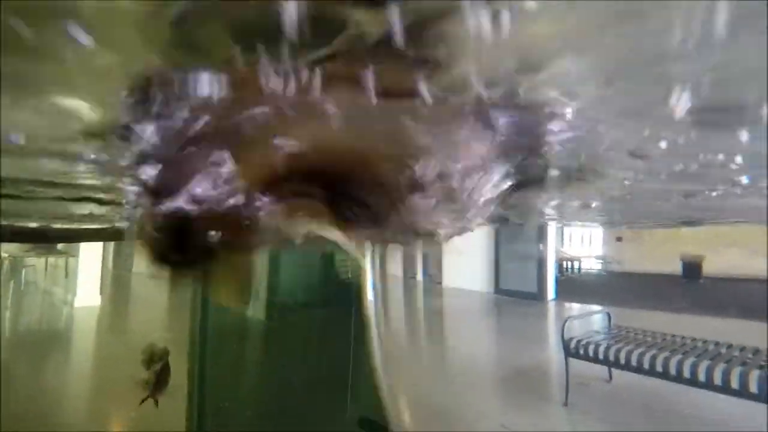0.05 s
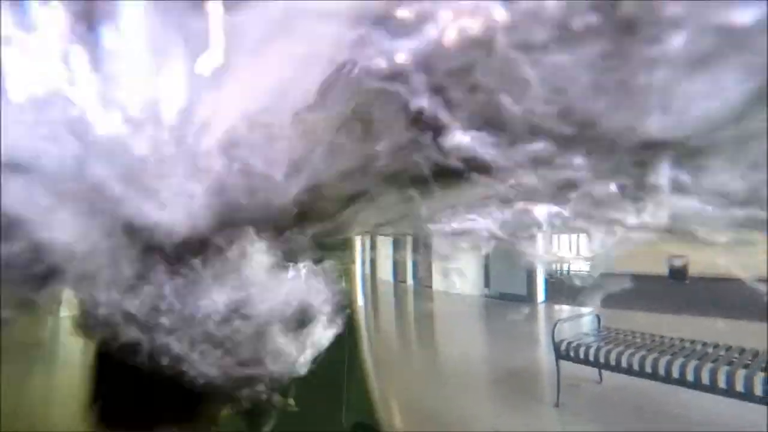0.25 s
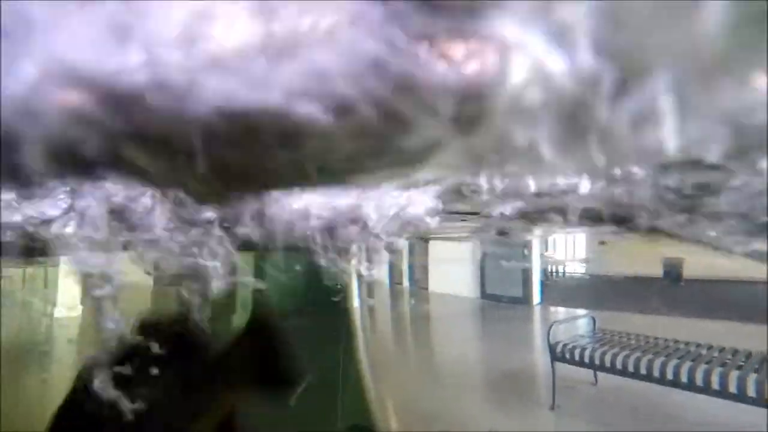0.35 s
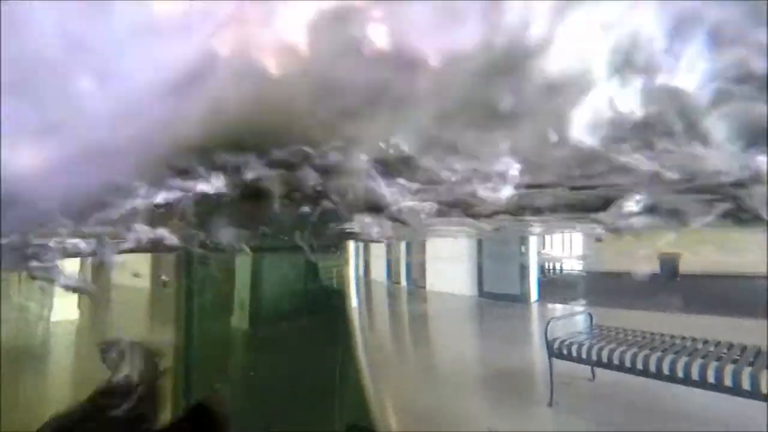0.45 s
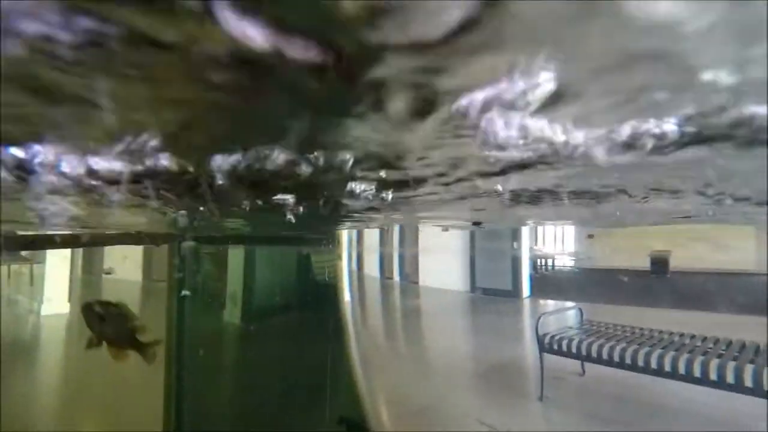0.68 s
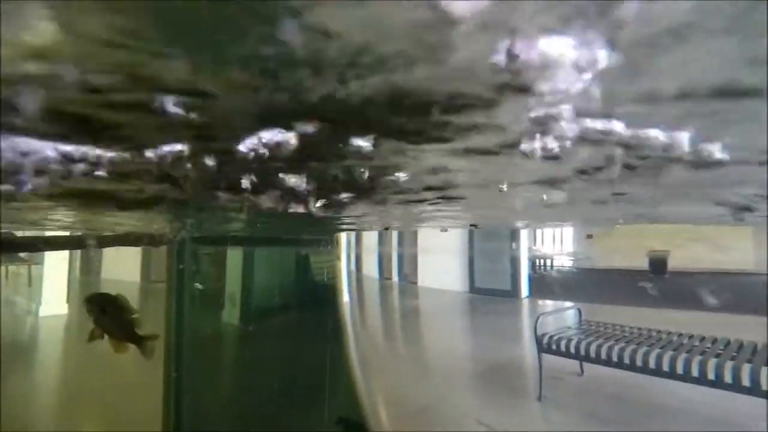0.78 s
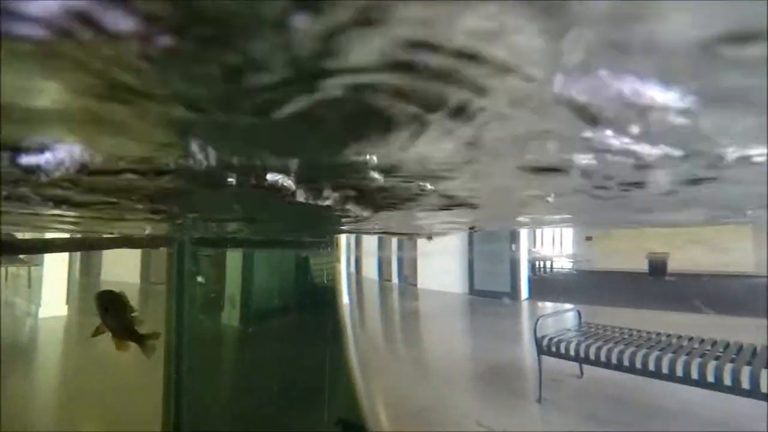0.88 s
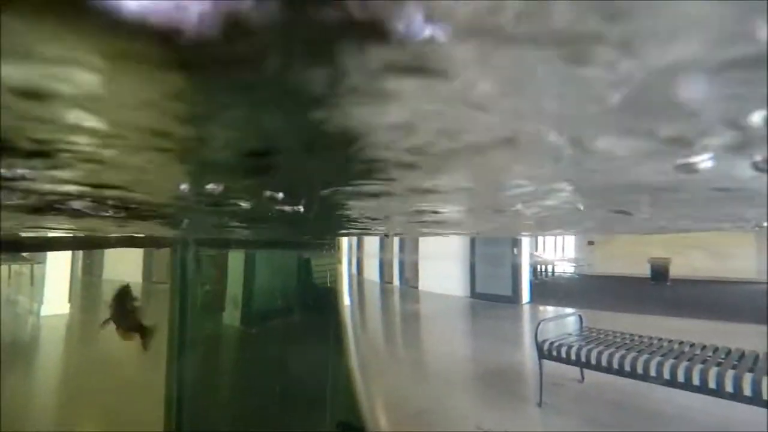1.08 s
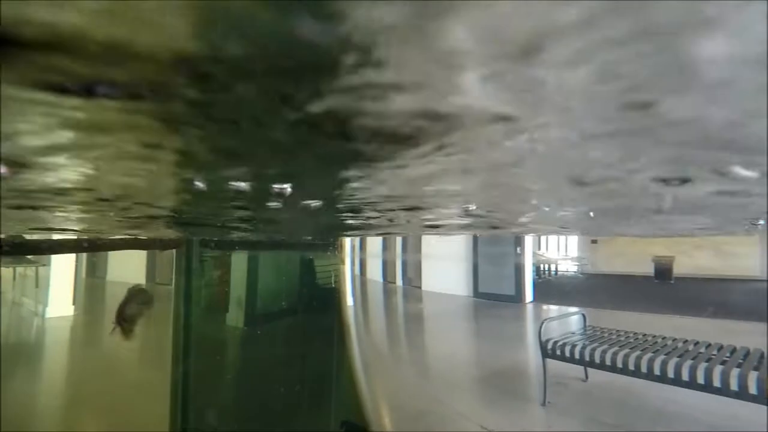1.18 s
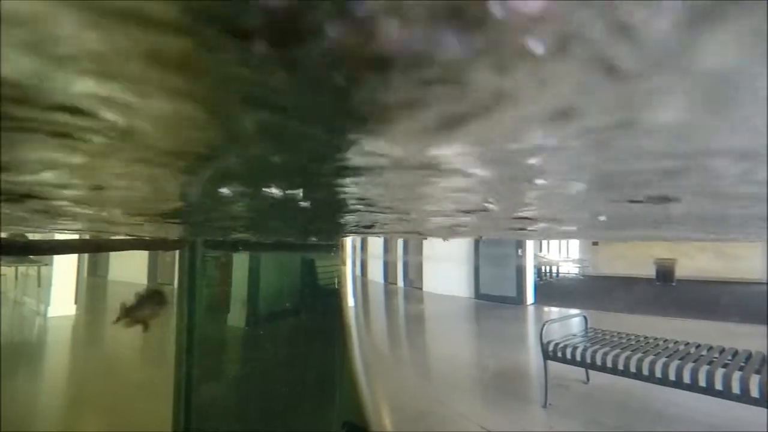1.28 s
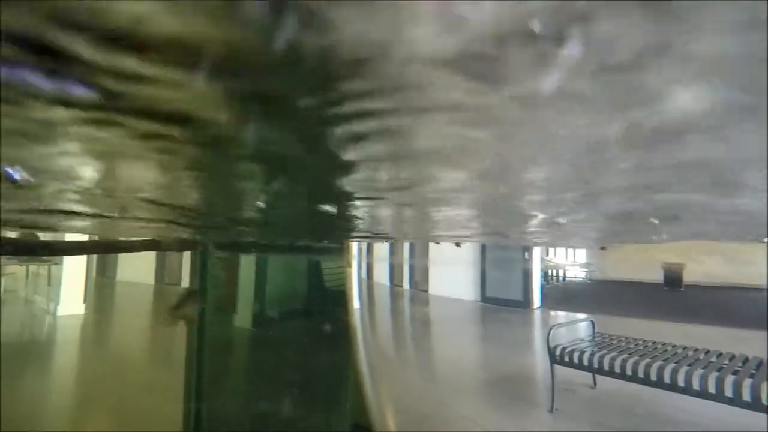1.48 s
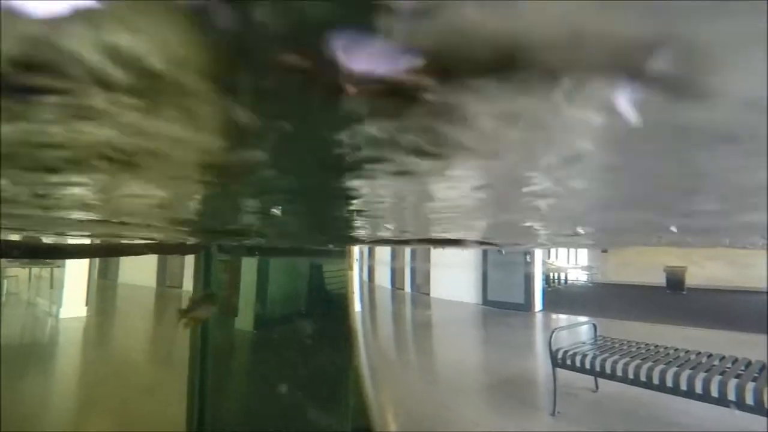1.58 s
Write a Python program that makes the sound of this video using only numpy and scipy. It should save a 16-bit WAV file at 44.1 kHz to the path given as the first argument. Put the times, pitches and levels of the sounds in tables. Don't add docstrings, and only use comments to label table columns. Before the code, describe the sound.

A fish splash in a tank, heard very close inside a housing just under water. Soft hollow gulps until 0.2 s, then a bright clatter of bubbles around 0.23-0.29 s and a sharper, snapping burst near 0.36 s, with dull thumps and hissing fizz. Gulps at 0.46 s, light ticks around 0.7 s, then sparse faint drips, one clearer near 1.28 s, over a low calm murmur until about 1.6 s.

```python
import sys
import numpy as np
from scipy import signal
from scipy.fft import rfft, irfft
from scipy.io import wavfile
from scipy.ndimage import uniform_filter1d

SR = 44100
rng = np.random.default_rng(int(sys.argv[2]) if len(sys.argv) > 2 else 0)


def natural_amplitude(level_db):
    exponent = np.asarray(level_db, float) / 20
    return 10 ** exponent


def transcribe(signal):
    frames = np.atleast_2d(signal).T
    limited = np.clip(frames, -1, 1)
    pcm = np.round(limited * 32767).astype(np.int16)
    wavfile.write(sys.argv[1], SR, pcm)


N = 72765

# t/s, level/dB (peak), f/Hz, t60/s
LARGE_BUBBLES = [(0.009, -39.5, 1630, 0.027), (0.042, -33.5, 558, 0.031), (0.049, -28.5, 670, 0.022),
                 (0.064, -38, 1070, 0.024), (0.089, -32, 1044, 0.031), (0.105, -36, 572, 0.046),
                 (0.128, -36, 690, 0.025), (0.143, -39, 737, 0.092), (0.158, -27, 672, 0.059),
                 (0.205, -20, 730, 0.014), (0.302, -18, 690, 0.056), (0.424, -31.5, 617, 0.023),
                 (0.455, -17, 602, 0.044), (0.464, -17.5, 676, 0.048), (0.143, -35, 1007, 0.034),
                 (0.066, -36.5, 388, 0.034), (0.5, -39.5, 1075, 0.04)]
# t/s, level/dB (peak), f/Hz, t60/s
SMALL_BUBBLES = [(0.062, -46, 2140, 0.045), (0.127, -49, 2270, 0.01), (0.1665, -29.5, 2150, 0.017),
                 (0.204, -32.5, 2230, .012), (0.2225, -26, 2290, 0.0037), (0.2318, -17, 1980, 0.014),
                 (0.2355, -13, 2430, 0.0051), (0.2385, -14.5, 2070, 0.0055), (0.2408, -14, 3925, 0.01),
                 (0.241, -20.5, 1540, 0.013), (0.2445, -8, 2300, 0.0068), (0.2475, -20, 2210, 0.01),
                 (0.2513, -8, 2630, 0.0081), (0.2568, -4, 2080, 0.0051), (0.2595, -14.5, 4990, 0.0085),
                 (0.2605, -15, 2590, 0.014), (0.2635, -12, 1845, 0.011), (0.264, -15.5, 1260, 0.011),
                 (0.2655, -11.5, 2960, 0.0095), (0.2745, -13, 2350, 0.0088), (0.280, -21, 2750, 0.0077),
                 (0.2825, -9.5, 2230, 0.0088), (0.2845, -14, 2855, 0.0091), (0.2872, -7.5, 2780, 0.007),
                 (0.3037, -19, 3920, 0.0091), (0.309, -49, 6120, 0.0068), (0.343, -20.5, 1470, 0.024),
                 (0.351, -17.5, 2360, .01), (0.3553, -4, 1780, 0.0075), (0.3593, -10, 2694, 0.013),
                 (0.361, -5.5, 1905, 0.014), (0.3665, -15.5, 5910, 0.0081), (0.369, -25, 5000, .007),
                 (0.3745, -25.5, 6170, 0.0061), (0.383, -24, 4650, 0.0092), (0.384, -25.5, 3060, 0.0096),
                 (0.3844, -24, 1890, 0.026), (0.392, -33, 2650, 0.013), (0.4015, -29, 2860, 0.017),
                 (0.4242, -33, 3480, 0.019), (0.427, -35, 2070, 0.016), (0.448, -32, 1733, 0.025),
                 (0.457, -25, 1050, .022), (0.4793, -29.5, 1883, 0.025), (0.5385, -36, 2030, 0.032),
                 (0.5766, -31.5, 1820, 0.019), (0.5684, -38.5, 4560, .01), (0.5833, -23, 3140, 0.0078),
                 (0.5884, -29.5, 2460, 0.019)]
# t/s, level/dB (peak), f/Hz, t60/s
LAST_DRIPS = [(0.6813, -31.5, 1890, 0.032), (0.7013, -24.5, 2366, 0.015), (0.7191, -31, 1920, 0.014),
              (0.7718, -36.5, 2500, 0.0066), (0.7865, -40.5, 2235, 0.0047), (0.7985, -37.5, 3840, 0.0035),
              (0.8231, -47, 3120, .007), (0.8436, -44.5, 2140, 0.012), (0.844, -47.5, 1040, 0.015),
              (0.8945, -46.5, 2160, .008), (0.9982, -34.5, 2170, 0.0096), (1.0317, -46, 1363, 0.0073),
              (1.0475, -46, 2275, 0.018), (1.048, -41.5, 3320, .007), (1.0895, -41, 2350, 0.0066),
              (1.2232, -44, 2230, 0.012), (1.233, -51.5, 1500, 0.016), (1.279, -34.5, 1100, 0.0077),
              (1.2798, -26.5, 1575, 0.022), (1.3375, -46.5, 1880, .008), (1.36, -50, 3865, 0.023),
              (1.5041, -56, 2630, 0.0098), (1.6114, -50.5, 2144, 0.016)]
# t/s, level/dB (peak), f/Hz (ring)
SPRAY_TICKS = [(0.05, -52, 12800), (0.061, -39, 13700), (0.1506, -43, 10300), (0.164, -45, 13500),
               (0.198, -39, 11300), (0.2314, -11.5, 6300), (0.2375, -20, 10900), (0.244, -21, 8000),
               (0.2655, -23, 11400), (0.270, -28, 6050), (0.251, -25, 10000), (0.255, -10, 6670),
               (0.2578, -12, 8100), (0.263, -14.5, 12900), (0.282, -17.5, 9700), (0.356, -19, 5350),
               (0.3587, 2, 8390), (0.3588, -4.5, 6580), (0.3657, -10, 8160), (0.3794, -18, 8740),
               (0.401, -43, 6600), (0.455, -32, 6450), (0.4733, -29.5, 7900), (0.486, -39, 6500),
               (0.491, -32.5, 6260), (0.506, -49, 6630), (0.525, -34, 6800), (0.531, -18.5, 8180),
               (0.594, -40.5, 6620), (0.6802, -9.5, 7820), (0.6961, -41, 11400), (0.7005, -14, 13930),
               (0.716, -30.5, 5400), (0.7196, -15.5, 12470), (1.0467, -35.5, 5510), (1.048, -37, 12600),
               (1.289, -47.5, 6270)]
# t/s, level/dB (peak), f/Hz (upper limit of the dull burst)
WAVELET_SLAPS = [(.001, -29.5, 310), (0.048, -25.5, 410), (0.256, -19, 495), (0.354, -13.5, 376),
                 (0.381, -14.5, 305), (0.302, -13, 417), (0.455, -19.5, 286), (.648, -36.5, 2510),
                 (0.757, -43.5, 5000), (0.772, -42.5, 3000), (0.785, -49, 1510), (0.798, -42, 3960),
                 (0.824, -42, 3120), (.842, -36, 1790), (0.893, -43, 2538), (0.944, -33.5, 690),
                 (0.983, -41, 5890), (0.997, -33.5, 2770), (1.026, -33, 700), (1.046, -35.5, 3100),
                 (1.087, -44, 2860), (1.145, -51, 3000), (1.222, -46.5, 2500), (1.28, -56, 2009),
                 (1.371, -37.5, 710), (0.778, -41, 700), (0.866, -42, 603), (0.985, -49, 604),
                 (1.64, -47, 500)]
# t/s, level/dB (peak), f/Hz
HOUSING_SURGES = [(-.017, -27.5, 67.4), (0.187, -20, 27.2), (0.233, -15.5, 66.4), (0.292, -14.5, 28.49),
                  (0.35, -14, 65.6), (0.3651, -16.5, 68.5), (0.438, -19.5, 76), (0.472, -38, 30.9),
                  (0.528, -34.5, 32), (0.563, -34.5, 66.3), (0.719, -41.5, 70), (.945, -35, 70),
                  (.95, -40, 40.8), (1.024, -33, 70), (1.073, -37.5, 42.1), (1.277, -38.5, 69),
                  (1.359, -39.5, 30.5), (1.478, -38.5, 33.8), (1.516, -57.5, 62)]
# t/s, level/dB
CHURN_LEVEL = [(0, -49.5), (0.188, -46), (.222, -33), (0.237, -26.5), (0.263, -17), (0.291, -28),
               (0.317, -30.5), (0.347, -34), (0.358, -17), (0.393, -34.5), (.43, -39.5), (.49, -41.5),
               (0.559, -47.5), (.6, -45.5), (.63, -53), (.74, -55.5), (.9, -63.5), (1.65, -61.5)]
# f/Hz, level/dB (per Hz)
MIST_SPECTRUM = [(1500, -25), (3500, -1.5), (6300, -2.5), (9000, -7.5), (14800, -10.5), (16000, -35)]
# f/Hz, level/dB (per Hz)
WASH_SPECTRUM = [(70, -42), (130, 0), (1290, -16), (2120, -5), (8130, -38), (14400, -43.5), (16400, -73)]
# f/Hz, level/dB (per Hz)
CALM_SPECTRUM = [(8.8, -24), (15, 10.5), (63, -0.5), (344, -30.5), (1440, -38), (2170, -34.5), (14500, -48),
                 (16400, -69)]
# f/Hz, width/Hz, lift/dB
SHELL_MODES = [
    (70, 18, 6.5),
    (128, 32, 3),
    (690, 120, 5.5),
    (2150, 910, 2.5),
    (3810, 280, 6),
    (6270, 760, 4),
    (8500, 1500, 3),
]


def bubble(hz, t60_s, rise_s, glide_per_cycle, wobble):
    t = np.arange(0, t60_s, 1 / SR)
    smooth_wobble = uniform_filter1d(np.resize(wobble, len(t)), round(0.00025 * SR))
    drift = np.cumsum(smooth_wobble) * np.sqrt(hz / 2000)
    cycles = hz * t * (1 + glide_per_cycle * hz * t / 2)
    u = t / t60_s
    decay = natural_amplitude(-15 * u - 30.4 * u ** 1.86)
    return np.sin(2 * np.pi * cycles + drift) * np.minimum(t / rise_s, 1) * decay


def bubbles(events, rise_s, glide_per_cycle, roughness):
    out = np.zeros(N)
    noises = rng.standard_normal((len(events), 5000))
    for (s, db, hz, t60_s), noise in zip(events, noises):
        add(out, s, natural_amplitude(db) * bubble(hz, t60_s, rise_s, glide_per_cycle, roughness * noise))
    return out


def fizz():
    per_s, spread_db, ring_cycles, tilt_db_per_octave = 2000, 3.5, 5.5, -3
    pitches = np.geomspace(448.5, 5000, num=30)
    born = rng.random(N) < per_s / SR
    strength = natural_amplitude(spread_db * np.minimum(rng.exponential(1, N), 5)) * born
    kind = rng.integers(0, len(pitches), N)
    cloud = np.zeros(N)
    for k, hz in enumerate(pitches):
        grain = bubble(hz, 3 * ring_cycles / hz, 1 / hz, 0.0083, np.zeros(1))
        sounded = signal.oaconvolve(strength * (kind == k), grain)[:N]
        cloud += natural_amplitude(tilt_db_per_octave * np.log2(hz / 2000)) * sounded
    return natural_amplitude(-3.5) * churn(1) * evened(housing(cloud))


def tick(db, hz, noise):
    t60_s, ring_db, body_db, phase_roughness = 0.0066, -2, 2.5, 0.26
    t = np.arange(len(noise)) / SR
    crack = evened(band(noise, 2, 2500, 12740))
    body = evened(band(noise, 2, 1200, 4000))
    fall = np.minimum(t / 0.00012, 1) * natural_amplitude(-60 * (t / t60_s) ** 1.252)
    tone = np.sin(2 * np.pi * hz * t + phase_roughness * np.cumsum(noise))
    ring = tone * np.minimum(t / 0.00075, 1) ** 2 * fall
    return natural_amplitude(db) * (0.2 * fall * (crack + natural_amplitude(body_db) * body) + natural_amplitude(ring_db) * ring)


def ticks():
    out = np.zeros(N)
    noises = rng.standard_normal((len(SPRAY_TICKS), 1500))
    for (s, db, hz), noise in zip(SPRAY_TICKS, noises):
        add(out, s, tick(db, hz, noise))
    return out


def slap(db, hz, noise):
    push_db, t60_s = -3.5, 0.034 * (1e3 / hz) ** 0.32
    t = np.arange(len(noise)) / SR
    dull = evened(band(noise, 3, 90, hz))
    push = natural_amplitude(push_db) * t * hz * np.exp(1 - t * hz)
    burst = 0.5 * dull * np.minimum(t / 0.0033, 1) * natural_amplitude(-60 * t / t60_s)
    return natural_amplitude(db) * (push + burst)


def slaps():
    out = np.zeros(N)
    noises = rng.standard_normal((len(WAVELET_SLAPS), 4000))
    for (s, db, hz), noise in zip(WAVELET_SLAPS, noises):
        add(out, s, slap(db, hz, noise))
    return housing(out)


def surge(db, hz):
    rise_cycles, fall_cycles, overtone_ratio, overtone_db = 0.9, 1.98, 1.867, -17.5
    cycles = np.arange(0, 9 / hz, 1 / SR) * hz
    swell = (1 - np.exp(-(cycles / rise_cycles) ** 2)) * np.exp(-cycles / fall_cycles)
    swell = swell / swell.max()
    upper = natural_amplitude(overtone_db) * swell * np.sin(2 * np.pi * overtone_ratio * cycles)
    return natural_amplitude(db) * (np.sin(2 * np.pi * cycles) + upper) * swell


def surges():
    out = np.zeros(N)
    for s, db, hz in HOUSING_SURGES:
        add(out, s, surge(db, hz))
    return out


def spray():
    level_db, flicker_db = -14, 3.5
    flicker = evened(uniform_filter1d(rng.standard_normal(N), size=90))
    return natural_amplitude(level_db + flicker_db * flicker) * churn(1.5) * murk(MIST_SPECTRUM, patchy_db=4.5)


def wash():
    return natural_amplitude(-9.5) * churn(0.87) * murk(WASH_SPECTRUM, patchy_db=5.5)


def calm():
    return natural_amplitude(-45) * murk(CALM_SPECTRUM, patchy_db=1.6)


def churn(follow):
    s, db = np.transpose(CHURN_LEVEL)
    return natural_amplitude(follow * np.interp(np.arange(N) / SR, s, db))


def murk(spectrum, patchy_db):
    settings = dict(nperseg=512, noverlap=384)
    patches = rng.standard_normal((N // 128 + 2, 257))
    patches = uniform_filter1d(patches, size=7, axis=0)
    patches = evened(uniform_filter1d(patches, size=7, axis=1))
    cells = signal.stft(rng.standard_normal(N), **settings)[2]
    patchy_noise = signal.istft(cells * natural_amplitude(patchy_db * patches.T), **settings)[1][:N]
    hz, db = np.transpose(spectrum)
    shape_db = np.interp(np.log(np.fft.rfftfreq(N, 1 / SR) + 1), np.log(hz + 1), db)
    return evened(housing(irfft(rfft(patchy_noise) * natural_amplitude(shape_db), N)))


def housing(x):
    hz = np.fft.rfftfreq(len(x), 1 / SR)
    lift_db = sum(db / (1 + (2 * (hz - f) / width) ** 2) for f, width, db in SHELL_MODES)
    return irfft(rfft(x) * natural_amplitude(lift_db), len(x))


def band(noise, order, low_hz, high_hz):
    sos = signal.butter(order, [low_hz, high_hz], "band", fs=SR, output="sos")
    return signal.sosfilt(sos, noise)


def evened(x):
    return x / np.sqrt(np.mean(x ** 2) + 1e-20)


def add(mix, s, sound):
    at = round(s * SR)
    sound = sound[max(-at, 0):]
    part = mix[max(at, 0):][:len(sound)]
    part += sound[:len(part)]


def scene():
    mix = bubbles(LARGE_BUBBLES, rise_s=0.00078, glide_per_cycle=0.0049, roughness=0.036)
    mix += bubbles(SMALL_BUBBLES, rise_s=0.00095, glide_per_cycle=0.0025, roughness=0.14)
    mix += bubbles(LAST_DRIPS, rise_s=0.00095, glide_per_cycle=0.00049, roughness=0.12)
    mix += fizz() + ticks() + slaps() + surges()
    mix += spray() + wash() + calm()
    return mix[None]


def roll_off(x):
    return signal.sosfilt(signal.butter(12, 16540, fs=SR, output="sos"), x)


def record(dry):
    low_pass = signal.firwin(255, 16000, window=("kaiser", 9), fs=SR)
    mix = signal.oaconvolve(dry, low_pass[None], "same")
    return roll_off(mix)


dry = scene()
out = record(dry)
transcribe(out)
```